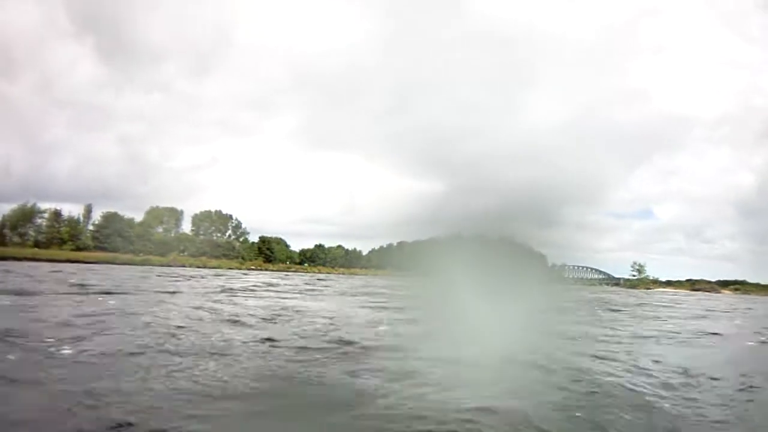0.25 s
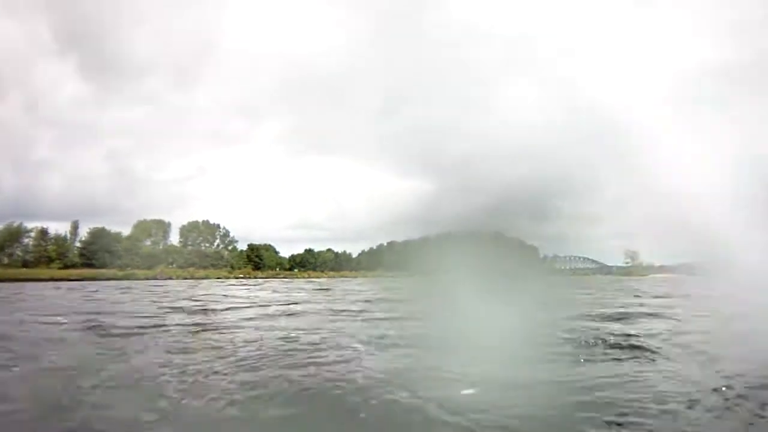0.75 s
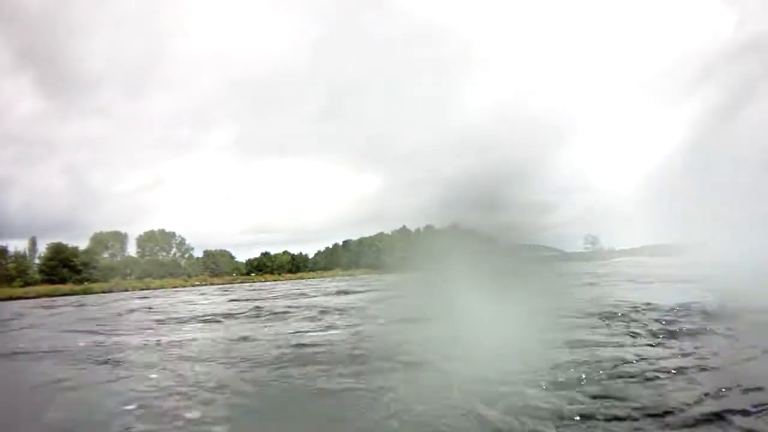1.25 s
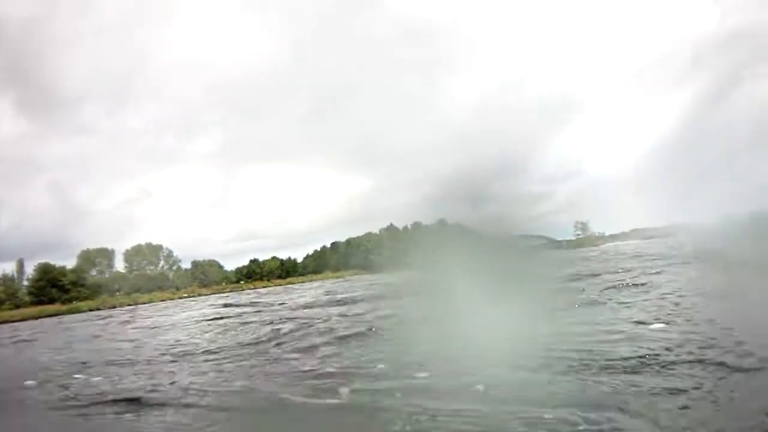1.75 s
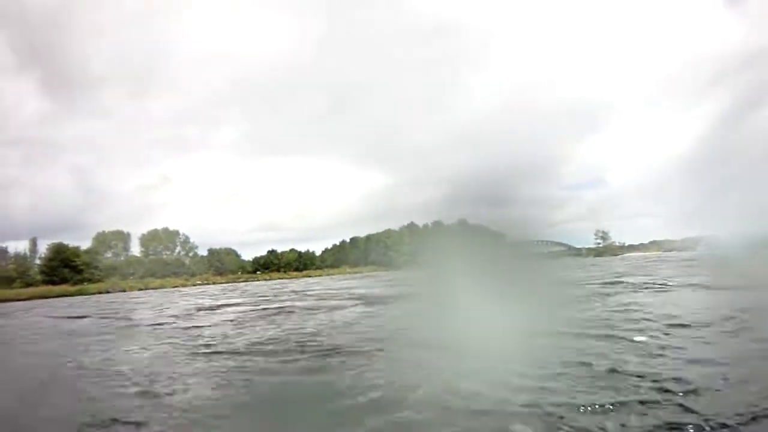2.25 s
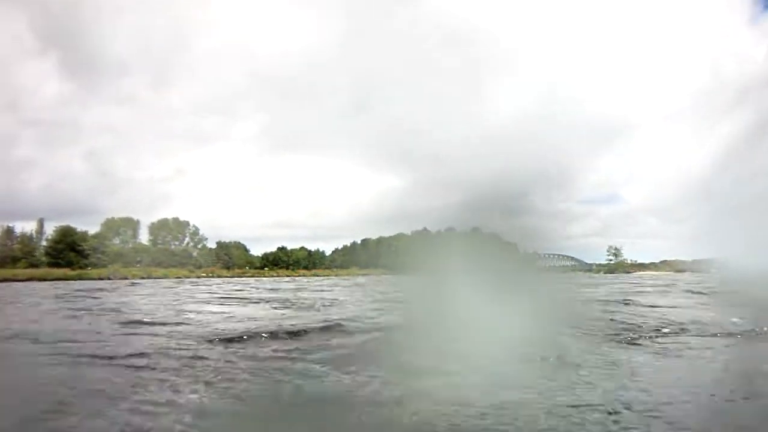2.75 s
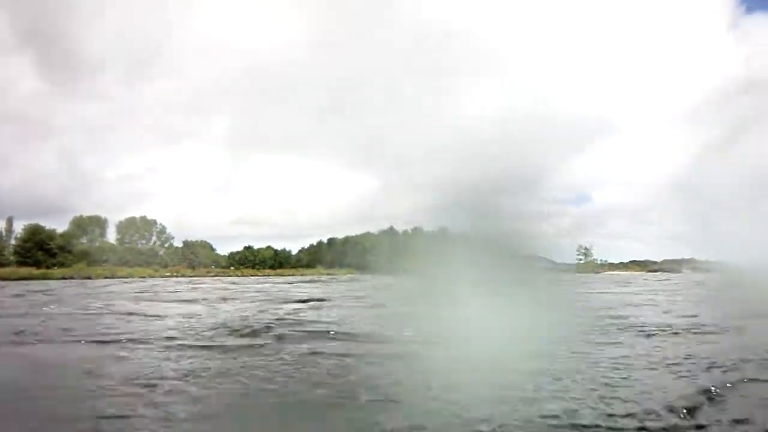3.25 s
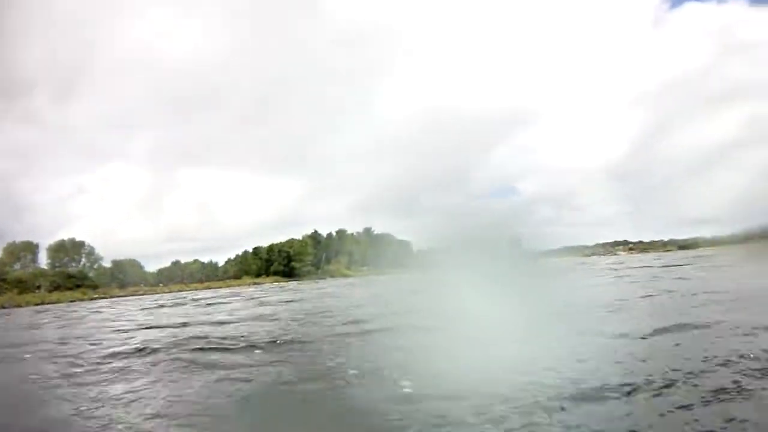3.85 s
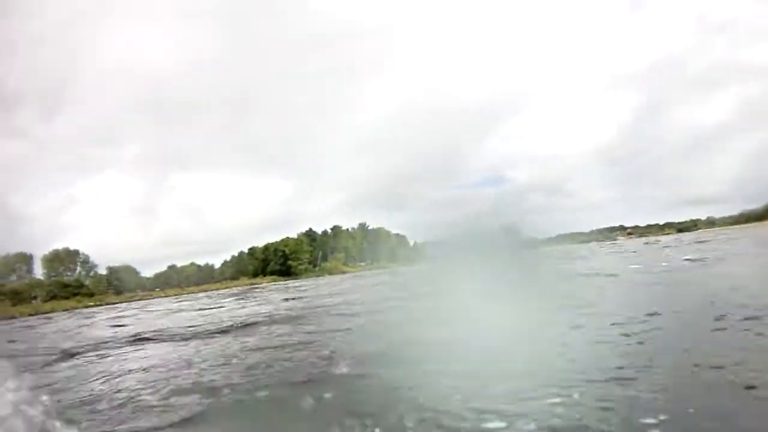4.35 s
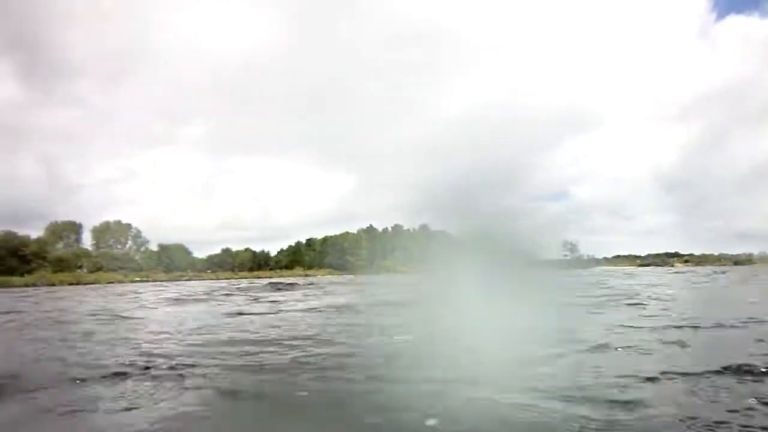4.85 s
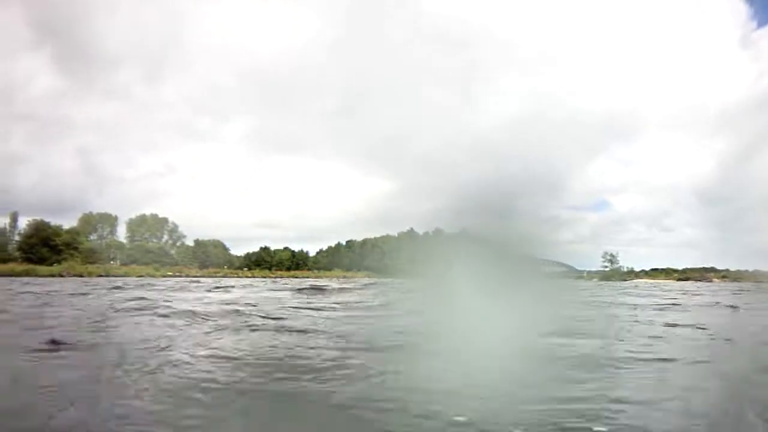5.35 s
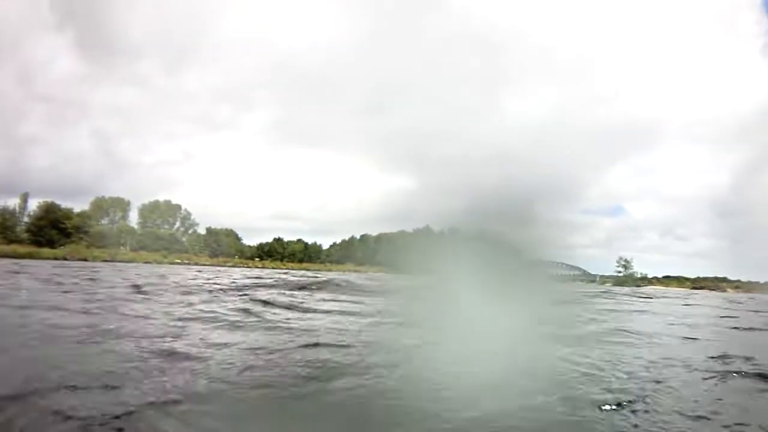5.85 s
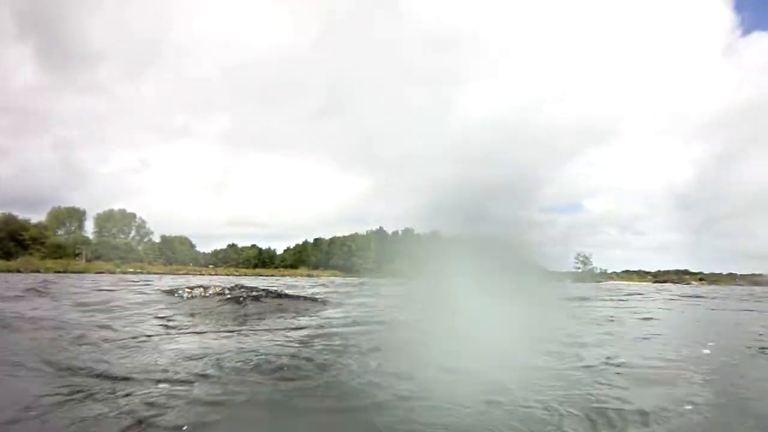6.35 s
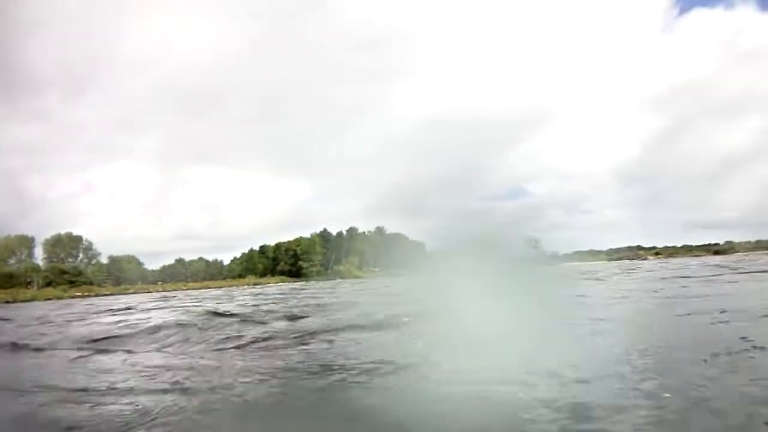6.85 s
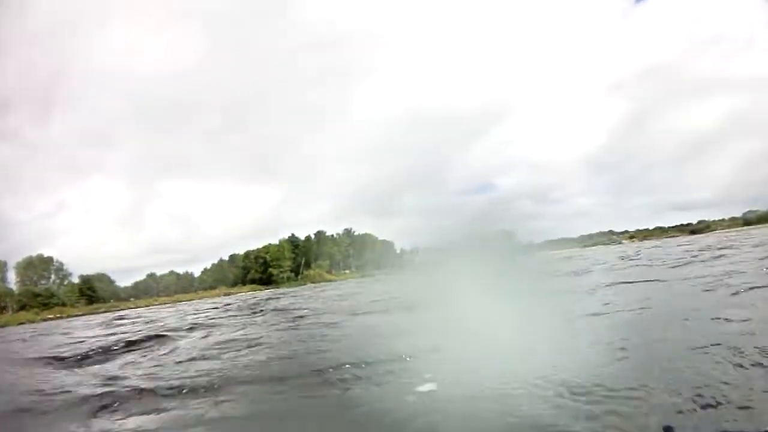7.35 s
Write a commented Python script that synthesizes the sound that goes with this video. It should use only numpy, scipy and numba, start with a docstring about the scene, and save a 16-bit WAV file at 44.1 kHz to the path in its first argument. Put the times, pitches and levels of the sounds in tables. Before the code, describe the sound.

Very close river water laps and breaks on a boat hull. After a quiet half second, irregular waves bring bursts of gurgling bubbles, round plops, fine spray and sharp ticks of water on the microphone's case. A few slaps boom through the hull, hardest just before the middle. A soft open-river wash and hiss continue behind, everything coloured hollow and boxy.

```python
"""Fast, choppy river water breaks against a boat hull, right beside a microphone in a waterproof case.
The open river washes and hisses behind throughout, and the current laps along the hull between waves.
From about half a second on, wave after wave stirs up crowds of bubbles made of short ringing tones.
Air pockets and lone bubbles plop from the start, water ticks on the case from 0.7 s, and slaps boom
through the hull, hardest near 3.4 s. Ringing filters give the case its hollow colour."""
import sys
import numpy as np
from scipy import signal
from scipy.fft import rfft, irfft
from scipy.io import wavfile
from scipy.ndimage import uniform_filter1d
from numba import njit

SR = 44100
rng = np.random.default_rng(int(sys.argv[2]) if len(sys.argv) > 2 else 0)


def unload_audio(sound):
    """Save the sound as a 16-bit wav file, at the path given as the first command line argument."""
    columns = np.transpose(np.atleast_2d(sound))
    # keep every value between -1 and 1, then stretch to whole-number steps
    steps = np.round(np.clip(columns, -1, 1) * 32767)
    wavfile.write(sys.argv[1], SR, steps.astype(np.int16))


N = 336042  # length of the scene in samples
MS = SR / 1000  # samples in a millisecond


def undb(db):
    """Turn decibels into a plain factor."""
    return 10 ** (np.asarray(db) / 20)


def curves(table):
    """The columns of a table, joined by straight lines in time."""
    s, *columns = np.transpose(table)
    return [np.interp(np.arange(N) / SR, s, c) for c in columns]


def add(out, s, sound):
    """Mix a sound in at time s, in seconds."""
    i = max(int(s * SR), 0)
    out[i:i + len(sound)] += sound[:max(N - i, 0)]


def unit(x):
    """Scale to an average (RMS) level of 1."""
    return x / np.sqrt(np.mean(x ** 2))


def walk(rate):
    """Smooth random wander: values held 1 / rate seconds, then smoothed twice; spread near 1."""
    k = max(int(SR / rate), 1)
    held = np.repeat(rng.standard_normal(N // k + 1), k)
    smooth = uniform_filter1d(uniform_filter1d(held, k), k)
    return unit(smooth[:N])


def band(x, lo_hz, hi_hz, order=3):
    """Keep the pitches between two limits (Butterworth band-pass)."""
    limits = [lo_hz, min(hi_hz, SR / 2 - 1)]
    return signal.sosfilt(signal.butter(order, limits, "band", fs=SR, output="sos"), x)


def steady(x, span_s):
    """Even out the level over spans of span_s seconds; the grain within stays."""
    k = max(int(span_s * SR), 1)
    power = uniform_filter1d(uniform_filter1d(x ** 2, k), k)
    return x / np.sqrt(np.abs(power) + 1e-9)


def through(x, response):
    """Hear a sound through a response, such as the ring of the case."""
    return signal.fftconvolve(x, response)[:len(x)]


# resonances of the case: (pitch [Hz], width before narrowing [Hz], level before depth scaling [dB])
CASE_RESONANCES = [(617, 53, -6), (884, 286, -1.5), (1149, 159, 4), (1414, 93, 1), (1585, 190, 1.5),
                   (1990, 430, -5.5), (2735, 354, -6.5), (3870, 1560, -11.5), (5740, 576, -8.5),
                   (6720, 1800, -16), (9230, 1250, -18), (10480, 730, -16.5)]


def case_response(depth, size=2048):
    """The case rings at its resonances, never before the sound; depth scales its peaks and valleys."""
    hz = np.arange(size // 2 + 1) * SR / size
    power = undb(-38.5) ** 2  # floor between the resonances
    for f, width, db in CASE_RESONANCES:
        power = power + undb(db) ** 2 / (1 + ((hz - f) / (0.66 * width)) ** 2) ** 2
    # fold the cepstrum forward in time: minimum phase
    cepstrum = irfft(depth * np.log(power) / 2)
    cepstrum[1:size // 2] *= 2
    cepstrum[size // 2 + 1:] = 0
    return irfft(np.exp(rfft(cepstrum)))[:size // 2]


# tone colour of the open river: (pitch [Hz], relative level [dB])
RIVER_COLOUR = [(25, 8), (55, 11.5), (110, 7.5), (400, 8.5), (500, 13), (620, 7), (1150, 6), (1700, 1),
                (2500, -3.5), (5000, -15)]
# wash of the open river, its level between 250 and 560 Hz: (time [s], level [dB])
RIVER_WASH = [(0, -66), (1.0, -66.5), (1.8, -64.5), (2.6, -65.5), (3.5, -66.5), (4.1, -70.5), (5.0, -70),
              (5.8, -69), (6.5, -69.5), (7.62, -70)]
FAR_HISS_DB = -72.5


def river(case):
    """Countless far ripples merge into a low wash that swells slowly, under an even hiss."""
    hz, db = np.transpose(RIVER_COLOUR)
    freqs = np.maximum(np.arange(N // 2 + 1) * SR / N, 1)
    colour = undb(np.interp(np.log(freqs), np.log(hz), db))
    wash = irfft(rfft(rng.standard_normal(N)) * colour, N)
    wash = wash / np.std(band(wash, 250, 560)) * undb(1.2 * walk(14))
    hiss = unit(band(through(rng.standard_normal(N), case), 4000, 18000, order=2))
    return wash * undb(curves(RIVER_WASH)[0]) + hiss * undb(FAR_HISS_DB)


FALL_S, SPRAY_FALL_S = .017, .028  # a broken wave collapses this fast; its spray hangs a little longer
RUNOFF_DB, SPRAY_RUNOFF_DB, RUNOFF_S = -19.5, -15.5, .11  # then the water runs back down the hull


def breaking(t, rise_s, hold_s, fall_s, runoff_db):
    """Strength of a wave t seconds after its crest: it builds, holds, collapses and runs off."""
    build = np.exp(np.minimum(t, 0) / rise_s)
    after = np.maximum(t - hold_s, 0)
    tail = undb(runoff_db)
    return build * ((1 - tail) * np.exp(-after / fall_s) + tail * np.exp(-after / RUNOFF_S))


SPRAY_LAG_S = .004  # spray flies up just after the crest
MEDIUM_DB = -55  # level of a medium wave
TRICKLE_GURGLE_SHARE = .52  # how far the trickle follows the gurgle rather than the spray
TRICKLE_DB, TRICKLE_GROWTH = -56.5, 1.2  # trickle of a medium wave, and its dB for each dB more
LAP_WAVER_DB = 2.5  # the lapping is never even
SPATTER_DB = 1.35  # the trickle comes in small spurts of its own
# current that laps along the hull between waves: (time [s], gurgle level [dB], spray level [dB])
LAPPING_CURRENT = [(0, -69, -68.5), (.4, -69, -72), (.68, -61, -63), (.94, -68, -73), (1.14, -60, -61),
                   (1.8, -62, -67), (2.2, -69, -75), (2.7, -65, -71), (3.25, -70, -74), (3.7, -68, -73),
                   (3.95, -61, -64), (4.2, -71, -75), (4.55, -62, -65), (5.35, -58, -63), (5.85, -59, -68),
                   (6.38, -73, -75), (6.66, -58, -64), (7.62, -63, -72)]
# waves that break on the hull:
# (crest time [s], gurgle level [dB], spray level [dB], rise [s], hold [s])
BREAKING_WAVES = [(0.551, -38, -57, .025, .04), (.72, -52, -54, .05, .03), (.83, -55, -58, .012, .012),
                  (1.04, -37, -54, .012, .07), (1.235, -43, -43, .018, .02), (1.29, -53, -56.5, .02, .03),
                  (1.55, -52, -65.5, .015, .08), (1.67, -42, -54, .025, .035), (1.83, -56, -56, .04, .04),
                  (2.09, -46, -63, .03, .02), (2.39, -47, -61, .04, .025), (2.599, -58, -64, .012, .015),
                  (2.701, -57, -64, .01, .012), (2.83, -50, -63, .04, .035), (2.932, -49, -63, .004, .008),
                  (3.34, -41, -53, .025, .02), (3.441, -46, -53.5, .012, .015), (3.83, -36, -55, .006, .06),
                  (4.041, -58, -60, .03, .012), (4.37, -52, -62, .008, .01), (4.414, -43, -56, .008, .02),
                  (4.534, -54, -57.5, .015, .08), (4.65, -46, -55, .03, .03), (4.721, -51, -53, .01, .012),
                  (4.88, -38, -53, .009, .03), (4.981, -40, -57, .035, .07), (5.121, -53.5, -60, .03, .1),
                  (5.311, -56, -58.5, .03, .07), (5.424, -39, -53.5, .018, .02), (5.53, -48, -62, .03, .03),
                  (5.7, -45, -58, .008, .1), (5.959, -56, -72, .02, .02), (6.179, -41, -63, .02, .05),
                  (6.47, -72, -66, .015, .03), (6.531, -59, -62, .015, .16), (6.725, -42, -51, .008, .012),
                  (6.81, -40, -58, .015, .015), (7.01, -54, -61, .02, .08), (7.325, -44, -66, .025, .17),
                  (7.565, -51.5, -69, .01, .015)]


def churning(size=2048):
    """Levels in dB of gurgle, trickle and spray: the power of the waves adds to the lapping."""
    t = np.linspace(0, N / SR, size)
    low, fine = 0, 0
    for s, db, spray_db, rise, hold in BREAKING_WAVES:
        wave = undb(db) * breaking(t - s, rise, hold, FALL_S, RUNOFF_DB)
        flying = breaking(t - s - SPRAY_LAG_S, rise, hold, SPRAY_FALL_S, SPRAY_RUNOFF_DB)
        low = low + wave ** 2
        fine = fine + (undb(spray_db) * flying) ** 2
    low, fine = curves(np.transpose([t, low, fine]))
    lap_db, lap_spray_db = curves(LAPPING_CURRENT)
    gurgle_db = 10 * np.log10(low + undb(lap_db) ** 2)
    spray_db = 10 * np.log10(fine + undb(lap_spray_db) ** 2)
    # the waver shrinks where a wave drowns the lapping
    waver = LAP_WAVER_DB * walk(25) * undb(.5 * (lap_db - gurgle_db))
    between_db = spray_db + TRICKLE_GURGLE_SHARE * (gurgle_db - spray_db)
    trickle_db = TRICKLE_DB + TRICKLE_GROWTH * (between_db - MEDIUM_DB)
    return gurgle_db + waver, trickle_db + waver + SPATTER_DB * walk(45), spray_db + waver


# tones of the hull: (pitch [Hz], relative level [dB], time to fall by 60 dB [s])
HULL_TONES = [(61, -11.5, 0.49), (78, 1, 0.072), (147, -6, 0.16), (310, -8, 0.026)]
# heavy water on the hull:
# (time [s], boom peak level [dB], slosh strength before its rise and mix [dB], slosh length [s])
HULL_THUMPS = [(0.554, -55, -57, 0.037), (1.046, -45, -55, 0.066), (1.686, -51, -66, 0.087),
               (2.046, -54, -78, 0.036), (2.132, -49, -71, 0.017), (3.351, -31, -50, 0.029),
               (3.831, -34.5, -57, 0.07), (4.367, -46.5, -61, 0.033), (4.418, -44, -65, 0.062),
               (4.89, -36, -77, 0.04), (5.70, -65, -64, 0.063), (5.796, -69, -58.5, 0.056),
               (6.717, -44, -43, 0.014), (6.81, -55, -76, 0.013)]


def hull(gurgle_db, size=16384):
    """The hull booms at its own tones under heavy slaps and rumbles as the water sloshes along it."""
    t = np.arange(size) / SR
    boom = np.zeros(size)
    for hz, db, t60 in HULL_TONES:
        boom += undb(db) * np.sin(2 * np.pi * hz * t) * np.exp(-np.log(1000) * t / t60)
    boom = band(boom, 36, 900, order=2)
    shake = unit(through(rng.standard_normal(N), boom))
    slosh = unit(band(rng.standard_normal(N), 130, 205, order=1))
    blows = np.zeros(N)
    surge = undb(-65 + .7 * (gurgle_db + 45))  # the rumble follows the gurgle
    for s, boom_db, slosh_db, length in HULL_THUMPS:
        add(blows, s, boom / np.abs(boom).max() * undb(boom_db))
        add(surge, s, undb(slosh_db) * (1 - np.exp(-t / 0.0037)) * np.exp(-t / length))
    return blows + surge * (undb(1.5) * shake + undb(-1.5) * slosh)


# drops and sheets of water that hit the case:
# (time [s], level before a fixed cut [dB], brightness [Hz])
CASE_HITS = [(0.7324, -31, 4150), (.747, -16.5, 6400), (1.224, -28, 4830), (1.235, -23, 2700),
             (1.2503, -14, 6000), (1.295, -30, 6000), (1.3198, -20.5, 5000), (1.466, -36, 6100),
             (1.961, -33.5, 10800), (3.353, -25, 5060), (3.4329, -15.5, 5700), (3.451, -19, 6500),
             (3.4597, -18, 7900), (4.0441, -28, 4750), (4.241, -45.5, 6000), (4.521, -37.5, 5840),
             (4.607, -29.5, 4760), (4.658, -20, 5930), (4.6692, -26, 6850), (4.7266, -22.5, 3950),
             (5.293, -34, 5300), (5.436, -31.5, 8400), (5.9724, -35.5, 5540), (7.2456, -34.5, 5050)]


def case_hits(case, size=1024):
    """Water flattens on the case in a few milliseconds: one hard, bright tick of noise."""
    out, ms = np.zeros(N), np.arange(size) / MS
    for s, db, hz in CASE_HITS:
        burst = rng.standard_normal(size) * (1 - np.exp(-ms / 0.59)) * np.exp(-ms / 1.6)
        sound = through(band(burst, hz, 1.37 * hz, order=1), case)
        sound = band(sound, 2400, 12000, order=2)
        peak = np.sqrt(uniform_filter1d(sound ** 2, size=40).max())  # loudest short stretch
        add(out, s - .0008, sound / peak * undb(db - 9.0))
    return out


@njit
def ring(start, hz, cycles, size, glide):
    """Bubbles: sines that fall by 1 / e in the given cycles and rise in pitch as they near the surface."""
    out = np.zeros(N)
    for k in range(len(start)):
        life, phase, first = cycles[k] * SR / hz[k], 0., int(start[k])
        for i in range(min(int(6 * life), N - first)):
            phase += 2 * np.pi * hz[k] * (1 + glide * i / life) / SR
            out[first + i] += size[k] * np.exp(-i / life) * np.sin(phase)
    return out


def bubbles(rate, lo_hz, hi_hz, cycles, spread_db, glide):
    """A crowd of bubbles, rate (a curve) a second: many faint, a few loud."""
    due = np.cumsum(rate) / SR
    when, pitch, life, size = rng.random((int(due[-1]), 4)).T
    start = np.searchsorted(due, when * due[-1]).astype(float)
    hz = lo_hz * (hi_hz / lo_hz) ** pitch
    loudness = undb(-spread_db * np.log(np.maximum(size, .01)))
    return ring(start, hz, cycles * 2 ** (2 * life - 1), loudness, float(glide))


def churn(db, case, lo_hz, hi_hz, rate, cycles, spread_db, rush_db):
    """Bubbles of one size class: harder churning makes more of them; the faintest merge into a rush."""
    effort = db - np.mean(db)
    crowd = bubbles(rate * undb(.5 * effort), lo_hz, hi_hz, cycles, spread_db, glide=.02)
    noise = rng.standard_normal(N)
    crowd, noise = [band(through(x, case), 0.88 * lo_hz, 1.044 * hi_hz) for x in (crowd, noise)]
    rush = undb(np.minimum(rush_db - .3 * effort, 3))  # share of the rush beside the bubbles
    mix = (steady(crowd, 0.037) + rush * unit(noise)) / np.hypot(1, rush)
    return mix * undb(db)


def spray(db, case):
    """Fine bubbles burst in uneven swells, and droplets patter back into the river as tiny clicks."""
    fizz = churn(db, case, lo_hz=4000, hi_hz=11400, rate=1300, cycles=4.2, spread_db=4.9, rush_db=-10)
    patter = churn(db, case, lo_hz=3700, hi_hz=8000, rate=550, cycles=1.2, spread_db=5, rush_db=-12)
    swells = undb(1.5 * walk(70))
    return (fizz + undb(-2.5) * patter) * swells * undb(-1.82)


def trickle(db, case):
    """Smaller, short-lived bubbles spatter where crests spill and run back."""
    return churn(db, case, lo_hz=1850, hi_hz=3300, rate=620, cycles=1.9, spread_db=4.9, rush_db=-10)


def gurgle(db, case):
    """Large bubbles folded under by the waves ring low."""
    return churn(db, case, lo_hz=690, hi_hz=1800, rate=400, cycles=2.4, spread_db=4.6, rush_db=-8)


def plop(case, db, hz, length, splat_db, size=2048):
    """A pocket of air is squeezed shut and rings, in a splat of torn water; gives lead in s and sound."""
    ms = np.arange(size) / MS
    rise = np.clip(1.0 - 0.12 * (db + 27), .7, 2.3)  # ms; louder pockets close faster
    swell = 1 - np.exp(-(ms / rise) ** 3)
    sag = .92 + 0.152 * np.exp(-ms / 3)  # the pitch drops as the pocket opens
    pocket = np.sin(2 * np.pi * np.cumsum(hz * sag) / SR) * np.exp(-ms / (0.67 * length))
    torn = unit(band(rng.standard_normal(size), 0.42 * hz, 3 * hz, order=2)) * np.exp(-ms / length)
    sound = through(swell * (pocket + undb(splat_db) * torn), case)
    sound = band(sound, 290, 7700, order=2)
    return (rise - 1.366) * MS / SR, sound / np.abs(sound).max() * undb(db + 2.68)


def close_pockets(case, pockets):
    """Air pockets and bubbles ring as they close, each at its moment."""
    out = np.zeros(N)
    for s, db, hz, length, splat_db in pockets:
        lead, sound = plop(case, db, hz, length, splat_db)
        add(out, s - lead, sound)
    return out


# small pockets close at random; levels stand above a medium gurgle, before the fixed lift in plop()
BLIPS_PER_S, BLIP_DB, BLIP_SPREAD_DB = 23, 12.5, 1
BLIP_CROWDING = 0.36  # dB that a pocket stands out less for each dB more of gurgle
BLIP_LOW_HZ, BLIP_HIGH_HZ, BLIP_DB_PER_OCTAVE = 948, 4780, -0.5
BLIP_CYCLES, BLIP_SPLAT_DB = 9.4, -9.5  # cycles in which the splat fades by 1 / e


def blips(case, gurgle_db):
    """Small stray pockets ring like the plops: the higher, the shorter and fainter."""
    when, pitch, strength = rng.random((int(BLIPS_PER_S * N / SR), 3)).T
    hz = BLIP_LOW_HZ * (BLIP_HIGH_HZ / BLIP_LOW_HZ) ** pitch
    around = gurgle_db[(when * N).astype(int)]
    db = around + BLIP_DB - BLIP_CROWDING * (around - MEDIUM_DB)
    db = db + BLIP_SPREAD_DB * (2 * strength - 1)
    db = db + BLIP_DB_PER_OCTAVE * np.log2(hz / BLIP_LOW_HZ)
    length_ms = BLIP_CYCLES * 1000 / hz
    splat_db = np.full(len(hz), BLIP_SPLAT_DB)
    return close_pockets(case, np.transpose([when * N / SR, db, hz, length_ms, splat_db]))


# air pockets and lone bubbles, large and small, that ring as they close:
# (time [s], level before a fixed lift [dB], pitch before its sag [Hz], splat length [ms],
#  splat strength beside the tone [dB])
AIR_POCKETS = [(.066, -45, 1080, 14, -5.5), (.271, -45, 894, 12, -10), (.417, -44, 2760, 2.5, -13),
               (.462, -43.5, 1570, 4.2, -11.5), (.488, -43, 724, 13, -13), (0.5252, -35, 1570, 2.9, -15),
               (0.5557, -31, 1157, 7.9, -14), (1.0107, -32, 2740, 4.7, -13), (1.0227, -25, 1086, 2.4, -9),
               (1.0466, -21.5, 915, 5.2, -13), (1.0541, -24.5, 1106, 2.7, -20),
               (1.098, -26.5, 1270, 3.7, 0), (1.19, -35, 1190, 8.9, 5), (1.2328, -26, 1800, 1.7, 22),
               (1.283, -34.5, 960, 7.4, -5), (1.322, -36, 1266, 2.2, -6), (1.4, -34.5, 2330, 2.6, -15),
               (1.469, -38, 1700, 4, -10), (1.4985, -34.5, 1220, 2.8, -33), (1.614, -35.5, 2210, 3.8, -4),
               (1.949, -42.5, 1226, 11, -26), (2.003, -40.5, 1100, 13, -16), (2.0308, -34, 1550, 4.6, -14),
               (2.0476, -27.5, 1150, 1.7, -29), (2.062, -32.5, 1180, 3.1, -16),
               (2.081, -40, 2750, 1.5, -19), (2.0934, -27.5, 1080, 4.8, 3), (2.1328, -26, 943, 4.7, -15.5),
               (2.213, -43.5, 1020, 3.4, -15), (2.332, -40.5, 4540, 0.88, -29),
               (2.3482, -32, 1600, 3.9, -2), (2.377, -40, 2300, 2, -14), (2.4111, -29.5, 2100, 2.5, -7),
               (2.682, -46, 860, 7.4, -13), (2.816, -25.5, 1180, 1, -36), (2.834, -23.5, 1000, 1.5, -28),
               (2.9313, -23, 1137, 3.3, -6), (2.941, -40, 2820, 2.5, -25), (3.021, -41.5, 1160, 5.4, -8),
               (3.171, -29, 933, 3.6, -14), (3.3214, -31, 1190, 2.5, 7), (3.3536, -12, 900, 2.3, -14),
               (3.4197, -31.5, 2400, 2.8, -10), (3.432, -15.5, 2950, 0.87, -8),
               (3.4533, -26.5, 2680, 2.4, 2), (3.626, -43.5, 1430, 18, 13), (3.8311, -18, 946, 4.9, -5.5),
               (3.848, -30.5, 1730, 4, -5), (3.868, -29, 1106, 12, -15), (3.8789, -28.5, 1210, 4.8, -12),
               (4.0228, -38, 1340, 2.7, -3), (4.054, -35, 4200, 3.8, -11.5),
               (4.2101, -35.5, 1234, 4.8, 1.5), (4.251, -42, 1990, 7.2, -6), (4.367, -30, 1450, 7.5, 22),
               (4.411, -30, 1006, 11, -1), (4.4486, -34, 1530, 6, -6), (4.542, -29, 1020, 1.8, -22),
               (4.6068, -30.5, 1540, 1.7, 4), (4.6582, -29, 813, 13, -3.5), (4.724, -25.5, 1310, 0.82, -3),
               (4.814, -33.5, 1250, 8.7, -27), (4.872, -26, 1133, 1.9, 0), (4.8837, -17.5, 1150, 2.4, 7),
               (4.89, -21, 1430, 5.1, -4), (4.9842, -26, 1860, 1.9, -14), (5.0427, -26, 1270, 2.4, -4),
               (5.1218, -36.5, 1232, 18, 9), (5.2164, -41, 913, 11, -10), (5.3822, -40, 1185, 6.3, -20),
               (5.4276, -27.5, 1160, 2.8, -34), (5.524, -37, 1074, 17, -19), (5.609, -49, 3030, 1.6, -12),
               (5.7009, -33, 1243, 5.5, 6), (5.766, -33.5, 1438, 3.3, -2), (5.7948, -35, 1095, 13, -5),
               (5.851, -42.5, 2270, 4.8, -4), (6.1591, -35, 1100, 5.8, -9), (6.1785, -32, 1160, 2.1, -23),
               (6.189, -28.5, 1390, 3.2, -32), (6.253, -45, 3030, 4.4, -8), (6.27, -40.5, 2670, 2.5, -8),
               (6.547, -40.5, 1970, 2.1, -10), (6.7217, -21.5, 947, 3.8, -3.5),
               (6.7275, -21, 1460, 1.4, -17), (6.776, -33.5, 1010, 6.9, -19), (6.8136, -26, 918, 7.1, -7.5),
               (7.0124, -25.5, 1360, 2.1, -9), (7.3003, -26, 967, 5.2, -25),
               (7.3629, -29.5, 1125, 8.2, -6.5), (7.4964, -32, 1235, 2.7, -26)]


def plops(case):
    """Air pockets and lone bubbles, large and small, each ring briefly as a plop as they close."""
    return close_pockets(case, AIR_POCKETS)


def scene():
    """Churning water, plops and ticks, all heard through the case, over the hull and the open river."""
    gurgle_db, trickle_db, spray_db = churning()
    case = case_response(depth=1.0)
    struck = case_response(depth=0.89)  # water that hits the wall itself drives it more evenly
    background = river(case) + hull(gurgle_db)
    water = spray(spray_db, case) + trickle(trickle_db, case) + gurgle(gurgle_db, case)
    hits = case_hits(struck) + blips(case, gurgle_db) + plops(case)
    return (background + water + hits)[None]


TOP_HZ = 11150


def record(dry):
    """The recorder cuts the top steeply, with an elliptic low-pass."""
    return signal.sosfilt(signal.ellip(10, .2, 70, TOP_HZ, fs=SR, output="sos"), dry)


dry = scene()
out = record(dry)
unload_audio(out)
```